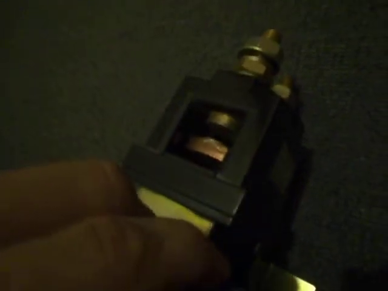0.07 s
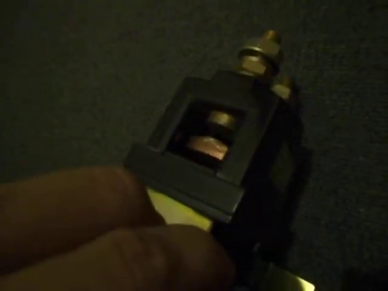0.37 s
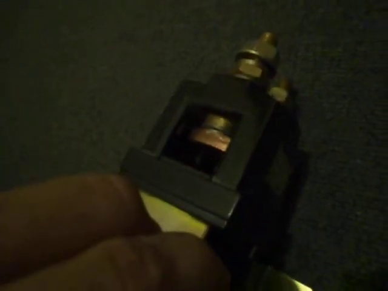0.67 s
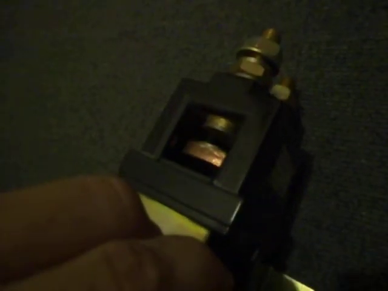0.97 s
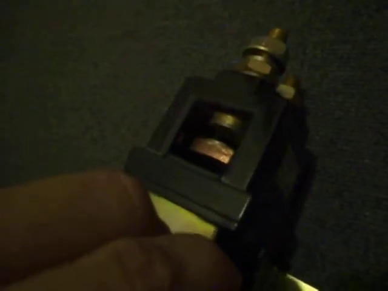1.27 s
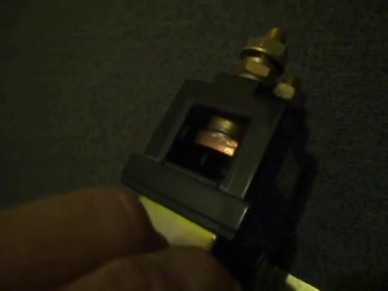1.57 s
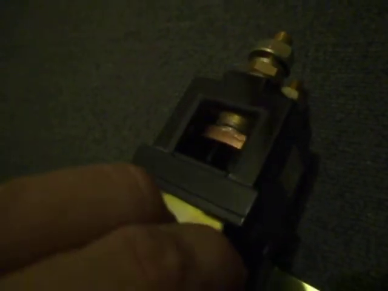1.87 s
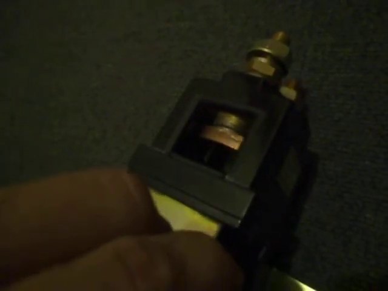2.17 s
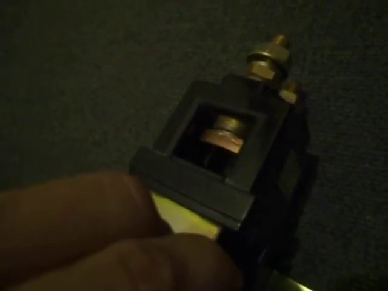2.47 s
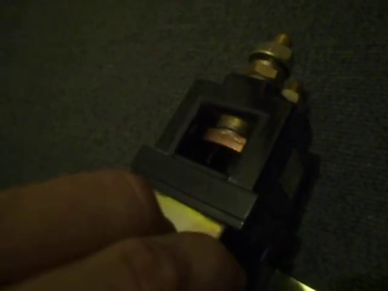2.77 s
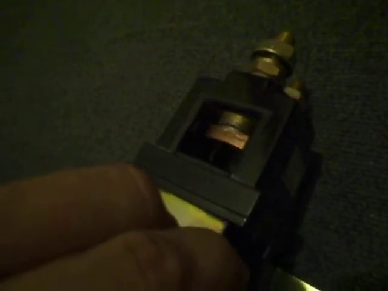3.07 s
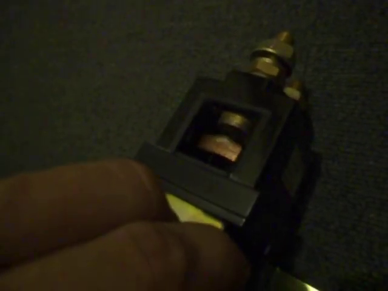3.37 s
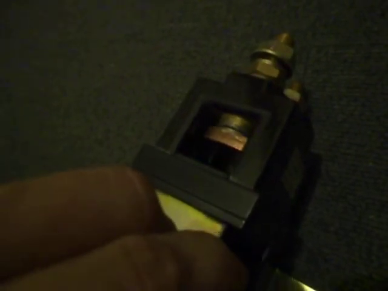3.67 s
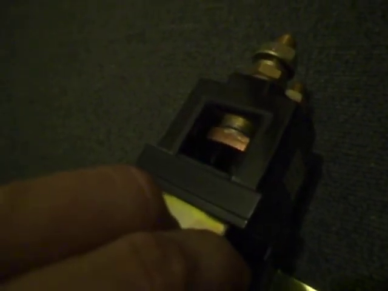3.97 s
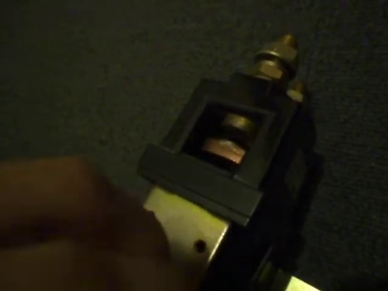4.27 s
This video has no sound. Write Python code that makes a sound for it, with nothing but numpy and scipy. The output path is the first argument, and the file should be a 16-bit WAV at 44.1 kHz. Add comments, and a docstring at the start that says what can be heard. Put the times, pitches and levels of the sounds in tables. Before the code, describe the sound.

Sharp metal clacks and bunches of clicks come irregularly as a heavy electrical contactor closes and releases in a small room.

```python
"""Over a faint hiss, a battery lead scratches and a heavy solenoid contactor slams home in one clack.
Held in the hand in a small room, it is pulled in four times and let go five times. On release the
plunger ticks, unsticks, slides, hits its back stop and bounces twice. Each impact excites the modes
of the frame and the damped ring of the housing, and the return spring sings on faintly. The fingers
shift at the end. The close, narrow-band microphone overloads on the hardest blows."""
import sys
import numpy as np
from scipy import signal
from scipy.fft import rfft, irfft, next_fast_len
from scipy.io import wavfile

SR = 44100
rng = np.random.default_rng(int(sys.argv[2]) if len(sys.argv) > 2 else 0)


def wrap_up_sound(samples):
    """Save the sound to the file named by the first command line argument, as 16-bit audio."""
    columns = np.atleast_2d(samples).T
    # keep every value between -1 and 1, then stretch to whole-number steps
    tamed = np.clip(columns, -1, 1)
    steps = np.round(tamed * 32767).astype(np.int16)
    wavfile.write(sys.argv[1], SR, steps)


N = 189894
TIME = np.arange(N) / SR
HIT_TIME = np.arange(SR // 5) / SR

# Noise spectra of the background and the hand. Each row: frequency in Hz, relative density in dB.
HISS_COLOUR = [(20, 2.5), (60, 2.5), (130, 0.5), (300, -0.5), (650, -0.5), (1400, -2), (3000, -5),
               (4600, -6), (5400, -12.5), (7000, -32.5)]
THUD_COLOUR = [(40, -24), (110, -8.5), (170, -4), (290, -0.5), (420, -0.5), (750, -12.5), (1300, -17.5),
               (2500, -55.5)]
RUB_COLOUR = [(300, -27.5), (1100, -10.5), (1700, -17), (2400, -3), (3200, 1.5), (4500, -3.5), (5200, -17),
              (6500, -25.5)]
# The battery lead on its terminal. Each row: start in seconds, level in dB, length in seconds.
LEAD_SCRATCHES = [(0.358, -52.5, 0.018), (1.202, -54, 0.022), (3.288, -55, 0.03), (3.962, -49, .02)]
# Reverberation of the walls. Each row: frequency in Hz, t60 (time to fall 60 dB) in seconds.
ROOM_DECAY = [(200, 0.23), (1000, 0.42), (3000, 0.34), (6000, 0.47)]
# Frequency responses along the sound's path. Each row: frequency in Hz, gain in dB.
FRAME_RADIATION = [(60, -31.5), (250, -17.5), (700, -4.5), (1400, -1)]  # a small frame radiates little bass
ROOM_RESPONSE = [(100, -19.5), (700, -8), (1900, 4), (2600, -1.5), (3300, 0), (4300, -3), (5000, -5),
                 (6000, -5)]
MICROPHONE_RESPONSE = [(5100, -0.5), (5500, -4.5), (6000, -10), (6450, -46), (7000, -95.5)]
OUTPUT_RESPONSE = [(30, 1.5), (100, 2.5), (220, 1), (5500, 1.5), (7000, -5), (10000, -8), (16000, -9.5)]  # after the overloaded stage
# Modes of the return spring. Each row: frequency in Hz, t60 in seconds, relative level in dB.
SPRING_MODES = [(1118, 1.25, 4.5), (1314, 0.95, -4.5), (2320, 0.69, 1.5), (2560, 0.55, -3)]
# Modes of the frame and contact bar. Each row: frequency in Hz, t60 in seconds, then relative level
# in dB when the contacts close, when they part and when the back stop is struck.
FRAME_MODES = [(1590, 0.023, -14.5, -22.5, -6.5), (2499, 0.034, -2.5, -8.5, -5.5),
               (2599.7, 0.048, -1, 1, -12.5), (2873, 0.044, -10.5, -21, -6.5),
               (3050, 0.062, -8, -18.5, -19.5), (3261, 0.081, -5.5, -13, -6), (3372, 0.029, -5, -9, -15),
               (3478, 0.064, -7, -7, -2.5), (4014, 0.021, 1, -9.5, -0.5), (4334, 0.027, -4.5, -7.5, -4),
               (4870, 0.046, -9, -17, -4.5), (5018, 0.039, -5, -15.5, -9.5), (5037, 0.012, -0.5, -11, 9.5),
               (5237, .025, -6, -14, -2.5)]
# The housing's dense, quickly damped ring. Each row: frequency in Hz, relative density in dB.
HOUSING_SLIDE = [(60, -55.5), (400, -36.5), (750, -9.5), (1400, -12.5), (2200, -7.5), (3000, -6.5),
                 (3800, 5.5), (4400, 0), (5200, -5), (6000, -6)]
HOUSING_KNOCK = [(60, -40), (300, -29), (480, -25), (750, -17.5), (1300, -12.5), (1600, -14), (2000, -7.5),
                 (2700, -16), (3500, -3.5), (4300, -2), (5100, -1.5), (6000, -4.5)]
HOUSING_SLAM = [(60, -43), (400, -25), (900, -14.5), (1400, -14), (2100, -7.5), (2600, -14), (3400, -2),
                (4300, -11.5), (5100, -0.5), (6000, -14.5)]
# A short low burst under each slam, where the overloaded microphone distorts. # Each row: frequency in Hz,
# relative density in dB.
THUMP_COLOUR = [(30, -11.5), (100, -4.5), (200, -0.5), (450, -1), (800, -2), (1300, -4), (2500, -36.5)]
# The plunger is let go. Each row: start in seconds, tick in dB, slide in dB, frame ring in dB over the
# slide, travel to the back stop in seconds, blow on the stop in dB, first bounce in dB.
LET_GO = [(0.7921, -43, -18.5, -8.5, .0399, -10.5, -21.5), (1.5899, -31, -19, -1, .0222, -8, -17),
          (3.052, -29.5, -19, -11.5, .0320, -8, -23.5), (3.3173, -46.5, -17, 1.5, .0361, -11.5, -23.5),
          (3.9812, -42.5, -19, -6.5, .0224, -11, -16)]
# The plunger slams home. Each row: start in seconds, level in dB, chatter length in seconds,
# brightness in dB per octave, spring level in dB.
SLAMS = [(0.3791, -5.5, 0.0053, 1, -68.5), (1.224, -5.5, 0.0062, 1, -59), (1.7511, -7, 0.0055, .5, -59.5),
         (3.4383, -7.5, 0.005, -1, -80)]

GRIP_S = 4.233  # the fingers shift


def amp(db):
    """Amplitude ratio of a level in decibels."""
    return 10 ** (np.asarray(db) / 20)


def unit(x):
    """Power normalisation to rms 1."""
    return x / np.sqrt(np.mean(x ** 2) + 1e-20)


def burst(x):
    """Energy normalisation to that of ten milliseconds at rms 1."""
    return x * np.sqrt(SR / 100 / (np.sum(x ** 2) + 1e-20))


def fade(t, t60):
    """Exponential decay, by 60 dB in t60 seconds."""
    return 1000 ** (-t / max(t60, 1e-4))


def along(points, hz):
    """Interpolation of (Hz, value) points on a logarithmic frequency axis."""
    frequencies, values = np.transpose(points)
    return np.interp(np.log(hz + 1), np.log(frequencies), values)


def coloured(x, points, tilt_db=0):
    """Minimum-phase filtering by (Hz, dB) points, tilted by tilt_db per octave about 4 kHz."""
    size = 2 * next_fast_len(len(x) // 2 + 4096)
    hz = np.fft.rfftfreq(size, 1 / SR)
    gain_db = along(points, hz) + tilt_db * np.log2((hz + 200) / 4200)
    cepstrum = irfft(np.log(amp(gain_db)))
    # folding the cepstrum makes the filter causal
    cepstrum[1:size // 2] *= 2
    cepstrum[size // 2 + 1:] = 0
    return irfft(rfft(x, size) * np.exp(rfft(cepstrum)))[:len(x)]


def add(track, start, sound):
    """Superposition of a sound on the track, from start in seconds."""
    part = track[round(start * SR):][:len(sound)]
    part += sound[:len(part)]


def noise(colour):
    """Stationary Gaussian noise of rms 1 with the given spectrum."""
    return unit(coloured(rng.standard_normal(N), colour))


def room(x, early_db=-16, late_db=-21, early_t60=0.13):
    """Reverberation by convolution: near surfaces reflect quickly, the walls add a longer, weaker tail."""
    t = np.arange(SR) / SR
    hz, slice_s, spectrum = signal.stft(rng.standard_normal(SR), SR, nperseg=256)
    decay = fade(slice_s / along(ROOM_DECAY, hz)[:, None], 1)
    late = signal.istft(spectrum * decay, SR, nperseg=256)[1][:SR]
    early = rng.standard_normal(SR) * fade(t, early_t60)
    arrival = np.clip((t - .004) / 0.012, 0, 1)
    response = sum(amp(db) * part * arrival / np.linalg.norm(part * arrival)
                   for db, part in [(early_db, early), (late_db, late)])
    return coloured(signal.fftconvolve(x, response)[:N], ROOM_RESPONSE)


def shove(attack_s, t60, hold_db):
    """Relaxation envelope of a finger's push: it builds up, then settles to a weaker steady slip."""
    rise = np.minimum(TIME / attack_s, 1) ** 2
    relaxation = fade(np.maximum(TIME - attack_s, 0), t60)
    return rise * np.maximum(relaxation, amp(hold_db))


def handling(thud_db=-42, thud_lead_s=.005, rub_db=-47, rub_lead_s=0.028):
    """Friction noise: the lead scratches its terminal; the fingers shift with a rub and a soft thud."""
    thud, rub = np.zeros((2, N))
    add(thud, GRIP_S - thud_lead_s, amp(thud_db) * shove(attack_s=0.0096, t60=0.23, hold_db=-11))
    add(rub, GRIP_S - rub_lead_s, amp(rub_db) * shove(attack_s=0.031, t60=0.19, hold_db=-8.5))
    for start, db, length in LEAD_SCRATCHES:
        add(rub, start, amp(db) * np.sqrt(np.linspace(0, 1, int(length * SR))))
    return thud * noise(THUD_COLOUR) + rub * noise(RUB_COLOUR)


def finger_slip(db=-30, start_hz=255, end_hz=135, t60=0.128, sink_t60=0.108):
    """Damped oscillation: a finger pad slips on the case, and its low note sinks as the grip loosens."""
    track = np.zeros(N)
    hz = end_hz + (start_hz - end_hz) * fade(HIT_TIME, sink_t60)
    swell = fade(HIT_TIME, t60) * (1 - fade(HIT_TIME, 0.023))
    add(track, GRIP_S, amp(db) * swell * np.sin(2 * np.pi * np.cumsum(hz) / SR))
    return track


def spring(released_db=-48, slack_t60=1.5):
    """Free vibration: the return spring rings long when squeezed; slack at the stop, it dies sooner."""
    track = np.zeros(N)
    squeezed = [(start, amp(db)) for start, *_, db in SLAMS]
    slack = [(start + travel, amp(blow_db + released_db) * fade(TIME, slack_t60))
             for start, *_, travel, blow_db, _ in LET_GO]
    for start, gain in squeezed + slack:
        ring = sum(amp(db) * fade(TIME, t60) * np.sin(2 * np.pi * (hz * TIME + rng.random()))
                   for hz, t60, db in SPRING_MODES)
        add(track, start, gain * ring)
    return track


def rattle(envelope):
    """Random excitation: a run of tiny contacts acts as noise under an envelope."""
    return burst(rng.standard_normal(len(envelope)) * envelope)


def frame(blow, tilt_db=0, scatter_db=2):
    """Modal superposition: where the frame is struck sets the strength of each decaying mode."""
    ring = 0
    for hz, t60, close_db, part_db, stop_db in FRAME_MODES:
        db = dict(close=close_db, part=part_db, stop=stop_db)[blow] + scatter_db * rng.standard_normal()
        # the plunger's position and the grip shift every mode a little from blow to blow
        hz = hz * (1 + .005 * rng.standard_normal())
        ring = ring + amp(db) * fade(HIT_TIME, t60) * np.sin(2 * np.pi * (hz * HIT_TIME + rng.random()))
    return burst(coloured(ring, FRAME_RADIATION, tilt_db))


def slides(snap_db=-4, slide_t60=0.085, catch_s=.0102, catch_db=-26, catch_t60=0.018, catch_ring_db=-7):
    """Sliding friction: the magnet lets go with a snap and the spring drags the plunger along its bore."""
    track = np.zeros(N)
    for start, _, slide_db, slide_ring_db, *_ in LET_GO:
        slide = (start, slide_db, slide_t60, slide_ring_db)
        catch = (start + catch_s, catch_db, catch_t60, catch_ring_db)  # it catches once on the way
        for onset, db, t60, ring_db in [slide, catch]:
            force = rattle(fade(HIT_TIME, t60)) + amp(snap_db) * rattle(fade(HIT_TIME, 0.0036))
            housing = burst(coloured(force, HOUSING_SLIDE))
            add(track, onset, amp(db) * burst(housing + amp(ring_db) * frame("part")))
    return track


def release_hits(tick_lead_s=.0095, flight_s=.0216, flight_at_db=-19, rebound_share=0.43, loss_db=14.5):
    """Inelastic bouncing: (seconds, dB) of each tick, blow on the stop and two ever shorter bounces."""
    hits = []
    for start, tick_db, _, _, travel, blow_db, bounce_db in LET_GO:
        flight = flight_s * amp(bounce_db - flight_at_db) ** .12  # a stronger bounce flies longer
        stop = start + travel
        hits += [(start - tick_lead_s, tick_db),  # the armature ticks before it unsticks
                 (stop, blow_db),
                 (stop + flight, bounce_db),
                 (stop + flight * (1 + rebound_share), bounce_db - loss_db)]
    return hits


def knocks(rattle_db=1, ring_db=-5, rattle_t60=0.036, ring_t60=0.12, bright_slope=.15, neutral_db=-13):
    """Impulse excitation: each knock of a release rattles the housing and rings the frame."""
    track = np.zeros(N)
    contact = burst(signal.unit_impulse(len(HIT_TIME)))
    for start, db in release_hits():
        force = contact + amp(rattle_db) * rattle(fade(HIT_TIME, rattle_t60))
        tilt_db = bright_slope * (db - neutral_db)  # harder knocks are brighter
        housing = burst(coloured(force, HOUSING_KNOCK, tilt_db))
        # the plunger resting on its stop damps the frame
        ring = frame("stop") * fade(HIT_TIME, ring_t60)
        add(track, start, amp(db) * burst(housing + amp(ring_db) * ring))
    return track


def pull_in(ring_db=1, housing_t60=0.018, housing_db=-1, thump_db=-20, thump_t60=0.0085,
            clamped_t60=0.024, build_t60=0.019):
    """Impact with contact chatter: contacts and plunger hit together, then seat; a low burst rides under it as
    the microphone overloads."""
    track = np.zeros(N)
    for start, db, chatter_s, tilt_db, _ in SLAMS:
        seated_s = np.maximum(HIT_TIME - chatter_s, 0)
        housing = burst(coloured(rattle(fade(seated_s, housing_t60)), HOUSING_SLAM, tilt_db))
        # once seated, the magnet clamps the frame and shortens its ring
        clamping = fade(seated_s, clamped_t60)
        ring = burst(frame("close", tilt_db) * clamping * (1 - fade(HIT_TIME, build_t60)))
        clack = burst(amp(housing_db) * housing + amp(ring_db) * ring)
        thump = burst(coloured(rattle(fade(HIT_TIME, thump_t60)), THUMP_COLOUR))
        add(track, start, amp(db) * (clack + amp(thump_db) * thump))
    return track


def scene(hiss_db=-66):
    """Superposition of the contactor, its reverberation, the hand and a faint hiss."""
    contactor = pull_in() + slides() + knocks() + spring()
    sound = contactor + room(contactor) + handling() + finger_slip()
    return (sound + amp(hiss_db) * noise(HISS_COLOUR))[None]


def record(dry, ceiling=0.58, hardness=9, offset=.011, top_hz=16700):
    """Saturation: a narrow-band input clips on the hardest blows, and the distortion adds a top fizz."""
    narrow = coloured(dry[0], MICROPHONE_RESPONSE)
    clipped = narrow / (1 + np.abs(narrow / ceiling) ** hardness) ** (1 / hardness)
    output = coloured(clipped, OUTPUT_RESPONSE) + offset
    low_pass = np.clip((top_hz - np.fft.rfftfreq(N, 1 / SR)) / 900, 0, 1) ** 2
    return irfft(rfft(output) * low_pass, N)[None]


dry = scene()
out = record(dry)
wrap_up_sound(out)
```